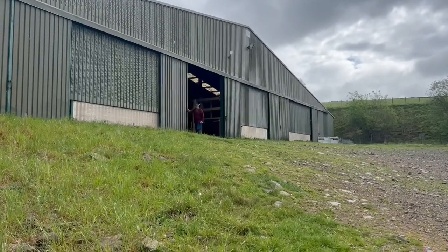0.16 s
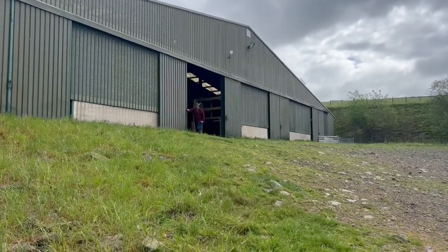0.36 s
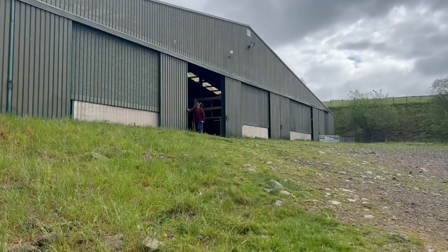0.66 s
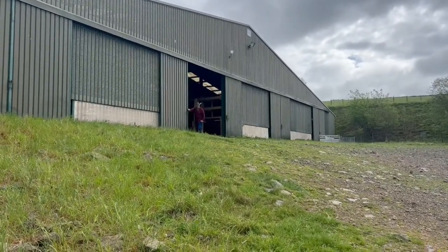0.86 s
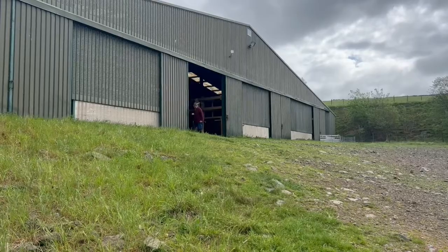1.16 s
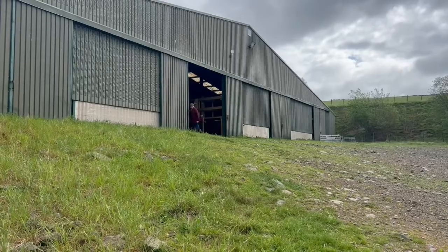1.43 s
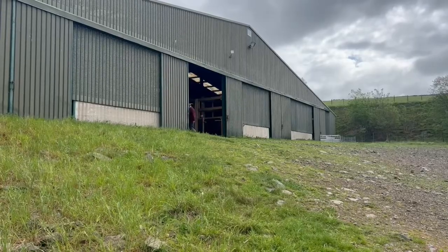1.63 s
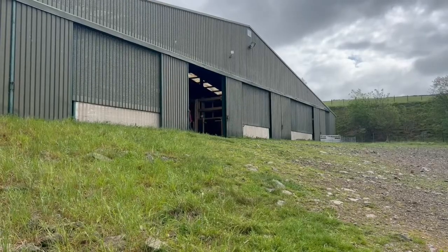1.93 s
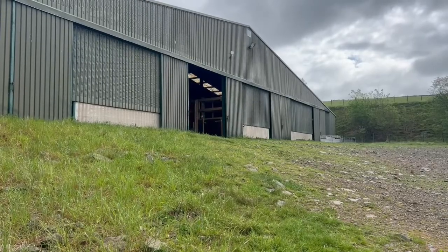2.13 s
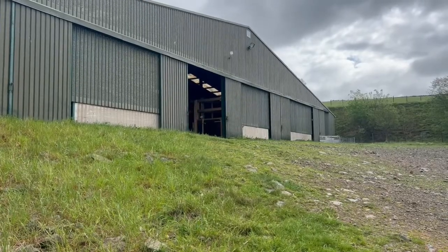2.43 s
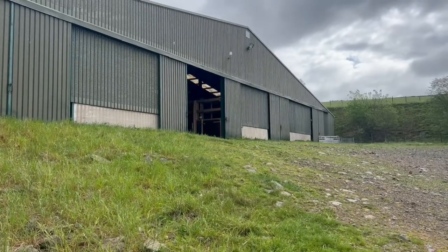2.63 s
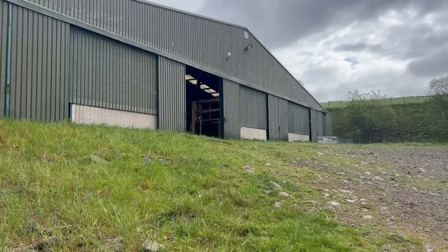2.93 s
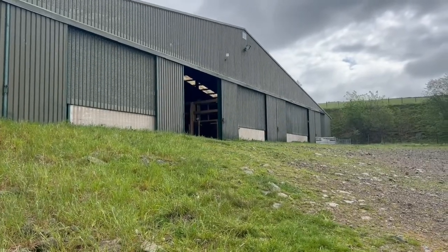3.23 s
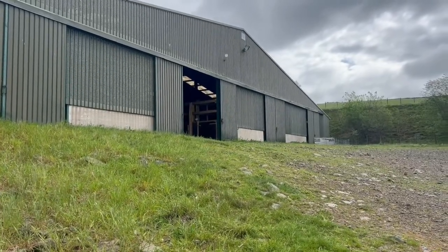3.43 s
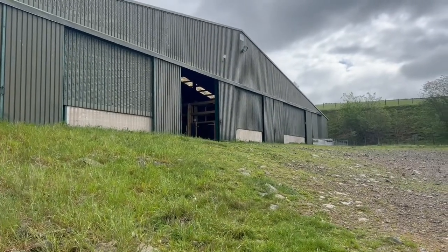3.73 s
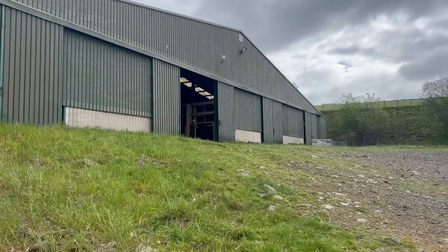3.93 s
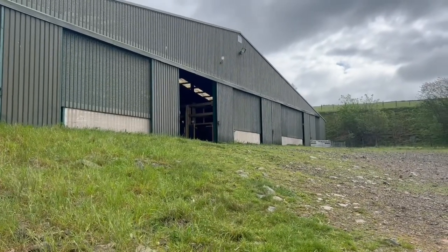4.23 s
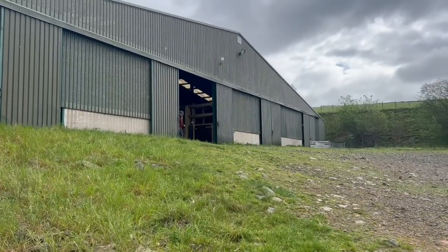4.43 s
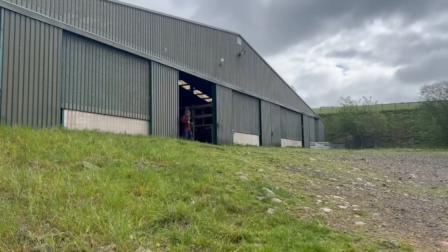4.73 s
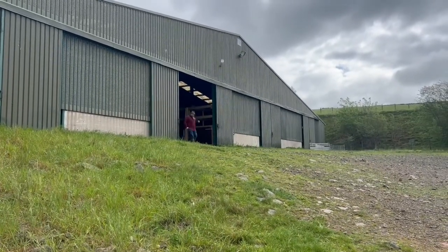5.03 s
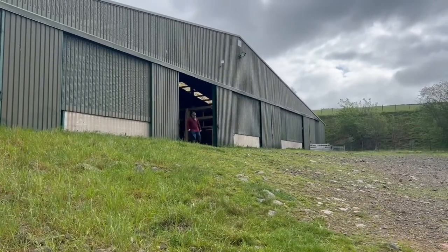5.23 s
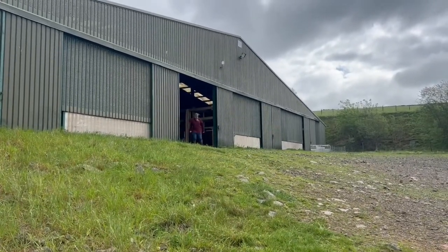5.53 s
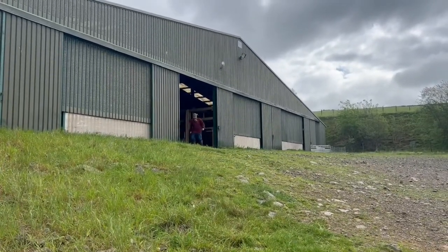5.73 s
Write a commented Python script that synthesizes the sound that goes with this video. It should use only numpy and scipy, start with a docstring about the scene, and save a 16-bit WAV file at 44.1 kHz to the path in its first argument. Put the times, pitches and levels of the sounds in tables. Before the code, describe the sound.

Gusty wind rumbles and thumps on a phone microphone while faint sweeping hisses and whistles, a distant sheep and small birds sound behind.

```python
"""A farmyard facing the open door of a big steel shed: gusts buffet a phone held low.
Wind is shaped noise that grows with each gust, plus single eddies that slap the microphone ports.
In the shed, blasts of air are noise with a ring that depends on pitch; something is swept in hissing,
whistling strokes of noise and moving resonances; a sheep bleats faintly as narrow bands over a rasp.
Small birds, as gliding tones with echoes, trill and chirp further off; dry ticks sound close by."""
import sys
import numpy as np
from scipy import signal
from scipy.fft import rfft, irfft, next_fast_len
from scipy.io import wavfile
from scipy.ndimage import uniform_filter1d

SR = 44100
rng = np.random.default_rng(int(sys.argv[2]) if len(sys.argv) > 2 else 0)


def pcm_store(signal):
    """Save signal as 16-bit PCM."""
    levels = np.round(np.clip(np.atleast_2d(signal), -1, 1) * 32767)
    wavfile.write(sys.argv[1], SR, levels.astype(np.int16).T)


N = 258867  # samples
TIME = np.arange(N) / SR  # s

# sweeping strokes: (start [s], length [s], relative hiss level [dB], treble relative to hiss [dB],
# relative whistle level [dB], whistle pitch at the start [Hz], whistle pitch halfway [Hz])
STROKES = [(0.24, 0.092, -65, -19, -72, 3200, 3300), (1.135, 0.12, -70.5, 1, -67, 2960, 3340),
           (1.298, .13, -69, -22, -66.5, 3140, 3150), (1.684, 0.1, -70.5, -7, -70.5, 3426, 3405),
           (1.845, 0.13, -76, -21, -68.5, 3190, 3135), (2.02, 0.11, -72.5, -19, -69.5, 3160, 3320),
           (2.339, 0.26, -73.5, -20.5, -72.5, 3150, 3310), (2.909, 0.24, -68.5, -5, -72.5, 3100, 3350),
           (3.158, 0.41, -62, -3, -64.5, 3230, 3556), (3.55, .21, -56.5, -14, -60, 2997, 3274),
           (4.019, 0.16, -65.5, -2, -64, 3330, 3440), (4.22, .13, -69, -16, -69.5, 3114, 3120),
           (4.515, 0.19, -66.5, -5.5, -67.5, 3070, 3240), (4.81, 0.15, -72, -9, -75, 3010, 3460),
           (5.22, 0.1, -70.5, -4, -66.5, 3030, 3490), (5.44, .14, -74, -10, -73, 3480, 3250),
           (5.735, 0.091, -79, -3, -73, 2860, 3150)]


def undb(db):
    """Decibel definition: 20 dB is a factor of ten in amplitude."""
    return 10 ** (np.asarray(db) / 20)


def unit(x):
    """Normalisation by effective value: scale to rms 1."""
    return x / np.sqrt(np.mean(x ** 2) + 1e-20)


def curve(rows, axis=1):
    """Linear interpolation in time of one column of a table."""
    rows = np.array(rows)
    return np.interp(TIME, rows[:, 0], rows[:, axis])


def at_pitch(points, hz):
    """Interpolation of (frequency, value) points on a logarithmic frequency axis."""
    f, value = np.transpose(points)
    return np.interp(np.log(np.maximum(hz, 1)), np.log(f), value)


def shape(x, gain):
    """Linear filtering: multiply the spectrum by a gain that is a function of frequency."""
    size = next_fast_len(N)
    hz = np.maximum(np.fft.rfftfreq(size, 1 / SR), 1)
    return irfft(rfft(x, size) * gain(hz), size)[..., :N]


def colour(x, points):
    """Spectral shaping to rms 1; the gain falls 12 dB per octave below the first point."""
    def gain(f):
        return undb(at_pitch(points, f)) * np.minimum(f / points[0][0], 1) ** 2
    return unit(shape(x, gain))


def butter(x, hz, kind, order=2):
    """Causal Butterworth filtering: low-, high- or band-pass with a maximally flat passband."""
    edges = np.clip(hz, 5, .45 * SR)
    return signal.sosfilt(signal.butter(order, edges, kind, fs=SR, output="sos"), x)


def octaves(x, first_hz, count):
    """Octave analysis: overlapping bands that add up to x again; yields (centre [Hz], band)."""
    for k in range(count):
        def gain(f):
            position = np.clip(np.log2(f / first_hz), 0, count - 1)
            return np.maximum(1 - abs(position - k), 0)
        yield first_hz * 2 ** k, shape(x, gain)


def walk(rate):
    """Slow random modulation: levels held for 1 / rate seconds, then smoothed; rms 1."""
    k = max(int(SR / rate), 2)
    steps = np.repeat(rng.standard_normal(N // k + 1), k)
    return unit(uniform_filter1d(uniform_filter1d(steps, k), k // 2)[:N])


def stereo(mid, side):
    """Sum-and-difference stereo: left and right from mid and side."""
    return np.array([mid + side, mid - side])


def wide_noise(side_db):
    """Partial coherence: white noise that is partly alike left and right."""
    return unit(stereo(rng.standard_normal(N), undb(side_db) * rng.standard_normal(N)))


def add(out, s, sound):
    """Superposition: mix a short sound into out at time s."""
    i = max(int(s * SR), 0)
    out[i:i + len(sound)] += sound[:N - i]


def hold_and_decay(start_s, length_s, rise_s, fall_s):
    """Exponential decay after a straight rise and a hold; fall_s is the amplitude time constant."""
    rise = np.clip((TIME - start_s) / rise_s, 0, 1)
    return rise * np.exp(-np.maximum(TIME - start_s - length_s, 0) / fall_s)


def trapezoid(start_s, length_s, edge_s):
    """Linear amplitude envelope: a straight rise, a hold and a straight fall after length_s."""
    rise = np.clip((TIME - start_s) / edge_s, 0, 1)
    return rise * np.clip(1 + (start_s + length_s - TIME) / edge_s, 0, 1)


def ring_noise(hz, width_hz):
    """Quadrature modulation: two slow noises on a carrier make one movable resonance."""
    phase = 2 * np.pi * np.cumsum(hz * np.ones(N)) / SR
    a, b = (unit(butter(rng.standard_normal(N), width_hz / 2, "lowpass")) for _ in range(2))
    return a * np.cos(phase) + b * np.sin(phase)


def echoes(x, t60_s):
    """Diffuse reverberation: convolution with decaying noise, partly alike left and right."""
    tail = wide_noise(-3)[:, :SR] * undb(-60 * TIME[:SR] / t60_s)
    tail = tail / np.linalg.norm(tail, axis=1, keepdims=True)
    return signal.fftconvolve(x[None], tail, axes=1)[:, :N]


def wind(side_db=-3.0):
    """Partial coherence of wind noise: the ports share gusts and eddies, with fine turbulence of their own."""
    # hardest eddies: (time [s], relative swing level [dB], relative snap level [dB], slap pitch [Hz])
    hard_eddies = [(0.052, -17.5, -46, 436), (0.254, -16, -35, 629), (0.579, -36, -35, 607),
                   (1.054, -33, -62, 299), (1.629, -24, -66, 372), (1.977, -24, -40.5, 442),
                   (2.172, -26, -31.5, 616), (2.537, -24.5, -53.5, 396.5), (2.640, -18.5, -28, 540),
                   (2.655, -9, -32, 364), (2.683, -15, -35, 348), (2.724, -12.5, -30.5, 413),
                   (2.737, -19.5, -30.5, 355), (2.773, -13.5, -48, 321), (2.934, -15.5, -21.5, 475),
                   (2.985, -20.5, -48.5, 474), (3.016, -16, -43, 397), (3.028, -17.5, -42.5, 336),
                   (3.095, -9, -23, 482), (3.126, -10.5, -26.5, 483), (3.155, -18, -31, 416.4),
                   (3.198, -14, -17.5, 483), (3.223, -15.5, -23.5, 577), (3.245, -15.5, -18, 473),
                   (3.294, -15, -18.5, 349), (3.307, -17.5, -21, 287.6), (3.346, -15.5, -30, 328),
                   (3.513, -17.5, -37, 477.6), (3.534, -19.5, -29.5, 439), (3.717, -23.5, -60, 479),
                   (3.981, -27.5, -51, 400.5), (4.160, -27.5, -52, 634), (4.171, -22.5, -41, 463),
                   (4.221, -25.5, -52.5, 386.5), (4.283, -15, -51, 381), (4.357, -25, -54, 362),
                   (4.375, -17, -40.5, 429), (4.398, -21.5, -65, 329), (4.457, -18.5, -33, 447),
                   (4.479, -28, -41, 557), (4.585, -22, -49, 358), (4.615, -18, -50.5, 619),
                   (4.627, -22.5, -62, 375.5), (4.689, -25.5, -61, 275.6), (4.969, -18, -58, 355),
                   (5.02, -23, -57, 380), (5.052, -13.5, -44.5, 637.7), (5.406, -29, -66, 382),
                   (5.649, -20, -55, 318), (5.711, -13.5, -55, 389.5), (5.743, -18, -42.5, 575),
                   (5.77, -14, -57, 328), (5.785, -17.5, -58, 482.7)]
    # lean of the wind to the left port: (frequency [Hz], share of mid [1])
    lean = [(400, 0), (650, .25), (1400, -.25)]
    gust_db, deep_db = wind_strength()
    eddies = hard_eddies + list(small_eddies(gust_db))
    mid, apart = (turbulence(gust_db, deep_db) + buffets(eddies) + tearing(gust_db) for _ in range(2))
    return stereo(mid, undb(side_db) * apart + shape(mid, lambda f: at_pitch(lean, f)))


def wind_strength(waver_db=5.0, waver_per_s=22, breeze_deep_db=2.0, rise_s=0.019, fall_s=0.039):
    """Addition of powers: gusts over a wavering breeze; gives stream and deep-rumble levels in dB."""
    # breeze between the gusts, before its waver: (time [s], level [dB])
    breeze = [(0, -37), (.35, -32.5), (.85, -35.5), (1.25, -37.5), (1.5, -44), (1.75, -31.5), (2.4, -38.5),
              (2.85, -34.5), (3.4, -32), (3.75, -34), (4.2, -32), (4.85, -32.5), (5.3, -33), (5.56, -37.5),
              (5.87, -25.5)]
    # gusts on top of the breeze: (start [s], length [s], level [dB], extra deep rumble [dB])
    gusts = [(0.0, 0.072, -22.5, -1.5), (0.215, 0.047, -28, -1), (0.54, 0.13, -34, 7),
             (1.319, 0.075, -34.5, 2), (1.565, 0.088, -29, 1.5), (1.808, 0.18, -24.5, -7),
             (2.088, 0.1, -25.5, 1.5), (2.536, 0.12, -20, 4.5), (2.625, 0.11, -18, 2), (2.998, 0.2, -17, 3),
             (3.187, 0.067, -14, -2), (3.237, 0.075, -12.5, 0.5), (3.494, 0.022, -17, -1),
             (3.744, 0.28, -34, 5), (4.243, 0.053, -27, 4.5), (4.336, 0.055, -22, 3),
             (4.444, 0.042, -24.5, 1.5), (4.579, 0.11, -24, 2.5), (4.76, 0.077, -36, 7),
             (4.939, 0.14, -24.5, 3), (5.114, 0.11, -28.5, -5.5), (5.693, 0.081, -23, 1.5)]
    power = undb(curve(breeze) + waver_db * walk(waver_per_s)) ** 2
    deep_power = power * undb(breeze_deep_db) ** 2
    for s, length_s, db, deep_db in gusts:
        gust = hold_and_decay(s, length_s, rise_s, fall_s)
        power = power + (undb(db) * gust) ** 2
        deep_power = deep_power + (undb(db + deep_db) * gust) ** 2
    return 10 * np.log10(power), 10 * np.log10(deep_power)


def turbulence(gust_db, deep_db, flutter_db=3.5, calm_db=-28, trim_db=-2, tilt_db=1.34, edge_hz=1400):
    """Turbulence scales: small eddies grow faster with the gust than large ones and come in bursts."""
    # rumble of the air stream: (frequency [Hz], relative spectral density [dB])
    rumble_spectrum = [(20, -10), (37, -7.5), (59, 6.5), (270, -7), (301, -7), (431, -15.5), (526, -17.5),
                       (653, -26), (857, -33.5), (1500, -54.5), (1950, -90.5), (3300, -120)]
    flutter, out = walk(70), 0
    steepen = .15  # extra dB per octave for each dB of gust above calm_db
    for hz, band in octaves(colour(rng.standard_normal(N), rumble_spectrum), 2 ** 5, count=7):
        fine = max(np.log2(hz / 100), 0)  # octaves above the big, slow eddies
        burst = unit(undb(flutter_db * min(0.048 + 0.58 * fine, 2) * flutter))
        stream_db = gust_db + (deep_db - gust_db) * max(1 - fine, 0)
        fine_db = fine * (steepen * (gust_db - calm_db) + tilt_db)
        out = out + band * burst * undb(stream_db + trim_db + fine_db)
    return butter(out, edge_hz, "lowpass", order=4)


def small_eddies(gust_db, swing_db=-11, scatter_db=6, snap_db=-35, calm_db=-28, hardening=0.41,
                 slap_hz=400, eddies_per_s=35):
    """Random arrivals: chance eddies grow with the wind and their snap faster; rows as in hard_eddies."""
    late, luck, speed = rng.random((400, 3)).T
    times = (np.arange(len(late)) + late) / eddies_per_s
    wind_db = np.interp(times, TIME, gust_db)
    size_db = wind_db + swing_db + scatter_db * (2 * luck - 1)
    sharp_db = size_db + snap_db + hardening * (wind_db - calm_db)
    pitch_hz = slap_hz * 2 ** (speed - .5)  # within half an octave either way
    return np.transpose([times, size_db, sharp_db, pitch_hz])[times < TIME[-1]]


def buffets(eddies, wake_hz=125, fall_s=0.00548, decay_s=0.011, rise_s=0.00053, snap_s=0.00068,
            shred_s=0.0033, shred_db=-13, swing_db=4.0, snap_db=1, crackle_db=-11, edge_hz=1700,
            softening=0.27):
    """Pressure transients: each eddy is a short snap, some shreds and a round swing of changing pitch.
    Eddies with little snap swell more gently."""
    out, t = np.zeros(N), np.arange(-SR // 40, SR // 14) / SR
    passing = np.exp(-abs(t) / shred_s)
    for (s, low_db, high_db, slap_hz), (turn, bulk) in zip(eddies, rng.random((len(eddies), 2))):
        onset_s = rise_s * undb(softening * (low_db - high_db))
        since = onset_s * np.logaddexp(0, t / onset_s)  # time since the slap, with a soft start
        swell = np.exp((t - since) / onset_s - since / decay_s)
        end_hz = wake_hz * 2 ** (.5 - bulk)
        pitch = end_hz + (slap_hz - end_hz) * np.exp(-since / fall_s)
        swing = swell * np.sin(2 * np.pi * (np.cumsum(pitch) / SR + turn))
        shreds = unit(butter(rng.standard_normal(len(t)), [450, 800], "bandpass", order=3)) * passing
        burst = rng.standard_normal(len(t)) * (np.exp(-(t / snap_s) ** 2) + undb(crackle_db) * passing)
        snap = butter(butter(burst, [700, 1350], "bandpass"), edge_hz, "lowpass", order=1)
        body = undb(low_db + swing_db) * (swing + undb(shred_db) * shreds)
        add(out, s + t[0], body + undb(high_db + snap_db) * 2 * snap / abs(snap).max())
    return butter(out, 1500, "lowpass", order=3)


def tearing(gust_db, level_db=-28, strong_db=-12, growth=3.72, ragged_db=5, build_s=0.013):
    """Nonlinear flow noise: a ragged crackle at the port grows much faster than the gust, up to strong_db."""
    # crackle of air tearing at the port: (frequency [Hz], relative spectral density [dB])
    crackle_spectrum = [(750, 5.5), (1600, -5), (2600, -15.5), (4300, -30.5), (5500, -41.5), (15000, -55.5)]
    crackle = colour(rng.standard_normal(N) * undb(ragged_db * walk(300)), crackle_spectrum)
    force = undb(growth * np.minimum(gust_db - strong_db, 0))
    keep = np.exp(-1 / (build_s * SR))
    lagging = signal.lfilter([1 - keep], [1, -keep], force)
    return undb(level_db) * crackle * np.minimum(force, lagging)  # builds slowly, falls at once


def air_blast(hold_s=0.031, rough_db=1.45, bounce_s=.003, bounce_db=-8):
    """Frequency-dependent reverberation: bursts of air ring in the shed, each octave with its own decay."""
    # colour of the blast: (frequency [Hz], relative level [dB])
    blast_spectrum = [(250, -34.5), (500, 2), (900, -3.5), (1350, -8), (1550, -15), (2100, -20.5),
                      (3400, -17), (5200, -28), (7000, -24.5), (9000, -28), (10300, -56), (11800, -29.5),
                      (13000, -33.5), (15500, -38)]
    # ring of the shed: (frequency [Hz], time to fall 60 dB [s])
    shed_t60 = [(300, 2.4), (1000, 1.89), (3300, 1.75), (7000, 1.16), (14000, 1.2)]
    # blasts; the first is already dying away at time 0: (time [s], relative level [dB])
    blast_times = [(-.5, -29.5), (0.348, -32)]
    air = wide_noise(-8)
    # a bounce off the floor makes it hollow
    air = air + undb(bounce_db) * np.roll(air, int(bounce_s * SR), axis=1)
    out = 0
    for hz, band in octaves(colour(air, blast_spectrum), 2 ** 8, count=7):
        fall_s = at_pitch(shed_t60, hz) / np.log(1000)
        out = out + band * sum(undb(db) * hold_and_decay(s, hold_s, 0.0031, fall_s) for s, db in blast_times)
    return out * undb(rough_db * walk(60))


def sweeping(body_db=-2, treble_db=-1, rise_s=0.02, t60_s=1.0, hard_db=-53):
    """Friction noise: hissing strokes hang in the shed; fixed resonances weaken when the push is soft."""
    # colour of the hiss: (frequency [Hz], relative level [dB])
    hiss_spectrum = [(1400, -34.5), (1800, 4.5), (2650, -0.5), (3100, 4.5), (3450, 7), (4100, -6.5),
                     (4500, -7), (5050, -11.5), (5600, -18.5), (6200, -18.5), (7500, -24.5), (8500, -20),
                     (9600, -37), (15000, -32)]
    # resonances rung by the push: (centre before its wander [Hz], width [Hz], relative level [dB])
    rings = [(1900, 100, -18), (2280, 180, -9.5), (3070, 110, -8), (4470, 82, -13)]
    power, treble_power = 1e-12, 1e-12
    for s, length_s, db, bright_db, *_ in STROKES:
        stroke = hold_and_decay(s, length_s, rise_s, t60_s / np.log(1000))
        power = power + (undb(db) * stroke) ** 2
        treble_power = treble_power + (undb(db + bright_db) * stroke) ** 2
    push = np.sqrt(power)
    scratch_db = 1.7
    hiss = colour(wide_noise(-4), hiss_spectrum) * undb(scratch_db * walk(42))
    body = shape(hiss, lambda f: 1 / (1 + (f / 4700) ** 8))
    treble = unit(hiss - body)
    hardness = np.sqrt(np.minimum(push / undb(hard_db), 1))
    wander = 1 + .008 * walk(9)
    mid, side = (hardness * sum(undb(db) * ring_noise(hz * wander, width) for hz, width, db in rings)
                 for _ in range(2))
    low_part = push * (undb(body_db) * unit(body) + stereo(mid, .5 * side))
    return low_part + undb(treble_db) * np.sqrt(treble_power) * treble


def squeal(echo_db=-2, t60_s=0.43, edge_s=0.03, droop=0.98):
    """Moving resonance: each stroke's breathy whistle bends in pitch, and the shed's echo holds on to it."""
    # resonances that bend together: (multiple of the whistle pitch [1], width [Hz], relative level [dB])
    bending = [(.91, 240, -7), (1, 150, -1), (1.385, 200, -17)]
    push, bend = 0, []
    for s, length_s, _, _, db, start_hz, middle_hz in STROKES:
        push = push + undb(db) * trapezoid(s, length_s, edge_s)
        bend += [(s, start_hz), (s + length_s / 2, middle_hz), (s + length_s, droop * middle_hz)]
    pitch = curve(sorted(bend))
    dry = push * sum(undb(db) * ring_noise(multiple * pitch, width) for multiple, width, db in bending)
    return dry + undb(echo_db) * echoes(dry, t60_s)


def overtones(width_hz=190, sag_per_s=0.057, edge_s=.06, level_db=-3, t60_s=0.76):
    """Extra resonances: some strokes ring their own, above or below the whistle; they sag and linger."""
    # resonances of single strokes: (start of the stroke [s], mid-stroke pitch [Hz], relative level [dB])
    extra_rings = [(1.135, 4450, -78.5), (3.158, 1840, -64.5), (3.158, 2110, -67.5), (3.158, 4450, -66.5),
                   (3.55, 5620, -67), (3.55, 6230, -75), (4.019, 5520, -72), (4.019, 8370, -80.5),
                   (4.515, 4500, -79), (4.515, 5550, -76), (5.22, 4770, -73.5)]
    dry = 0
    for s, hz, db in extra_rings:
        length_s = min(STROKES, key=lambda stroke: abs(stroke[0] - s))[1]
        push = trapezoid(s, length_s, edge_s)
        pitch = hz * (1 - sag_per_s * np.clip(TIME - s - length_s / 2, -length_s, length_s))
        dry = dry + undb(db + level_db) * push * ring_noise(pitch, width_hz)
    return dry + echoes(dry, t60_s)


def bleat(rasp_db=-68, smear_hz=32):
    """Partials in a reverberant space: the shed smears each into a wavering band over a breathy rasp."""
    # partials at full effort: (frequency [Hz], level [dB])
    partial_levels = [(635, -63.5), (942, -83), (1217, -85), (1394, -89), (1507, -72.5), (1717, -79),
                      (2148, -71), (2363, -70), (2470, -84.5), (2620, -81)]
    # course of the bleat: (time [s], effort [dB])
    effort = [(2.02, -34), (2.2, -3.5), (2.55, -2), (2.85, -5.5), (3.2, -14)]
    # breathy part: (frequency [Hz], relative level [dB])
    rasp_spectrum = [(900, -7), (1800, -4.5), (2300, 0.5), (2650, -1.5), (2900, -17.5), (6000, -49)]
    partials = sum(undb(db) * ring_noise(hz, smear_hz) for hz, db in partial_levels)
    rasp = undb(rasp_db) * colour(wide_noise(-0.5), rasp_spectrum)
    sounding = (TIME > effort[0][0]) & (TIME < effort[-1][0])
    return (partials + rasp) * sounding * undb(curve(effort))


def ticks(decay_s=0.00095):
    """Impulsive excitation: tiny dry clicks of grit and grass close by, as decaying band-passed noise."""
    # ticks: (time [s], peak level [dB], lowest frequency [Hz], highest frequency [Hz])
    tick_rows = [(.29, -57, 5700, 8600), (3.4, -50, 8000, 9800), (3.532, -47.5, 5800, 9530),
                 (3.816, -51, 8030, 9640), (4.75, -47.5, 1400, 3110), (4.984, -49, 1600, 3630)]
    out, t = np.zeros(N), TIME[:SR // 20]
    for s, db, low_hz, high_hz in tick_rows:
        burst = rng.standard_normal(len(t)) * np.exp(-t / decay_s)
        grit = butter(burst, [low_hz, high_hz], "bandpass", order=3)
        add(out, s, undb(db) * grit / abs(grit).max())
    return out


def chirp(length_s, from_hz, to_hz, fuzz_hz=0):
    """Frequency modulation: one gliding note, slightly off pitch by chance, with a fast random tremble."""
    size = int(length_s * SR)
    tremble = unit(uniform_filter1d(rng.standard_normal(size), size=90))
    glide = np.linspace(from_hz, to_hz, size) * (1 + 0.0068 * rng.standard_normal())
    pitch = glide + fuzz_hz * tremble
    return np.hanning(size) * np.sin(2 * np.pi * np.cumsum(pitch) / SR)


def birds(trill_s=0.57, step_s=0.081, trill_db=-75, chirp_db=-3, echo_db=-1, t60_s=0.49):
    """Direct and scattered sound: a quick trill and a few lone, husky chirps with echoes of the yard."""
    # lone chirps: (time [s], length [s], nominal start pitch [Hz], nominal end pitch [Hz],
    # relative level [dB])
    lone_chirps = [(2.088, 0.088, 3227, 3400, -58), (4.972, .06, 4460, 4150, -65.5),
                   (5.093, 0.058, 3730, 4000, -66), (5.68, 0.058, 4070, 3810, -68)]
    out = np.zeros(N)
    uneven_db, fuzz_hz = 2.5, 150
    for k, (loud, late) in enumerate(rng.standard_normal((18, 2))):
        note = chirp(0.035, 4480, 4170, fuzz_hz)
        add(out, trill_s + k * step_s + 0.0028 * late, undb(trill_db + uneven_db * loud) * note)
    for s, length_s, from_hz, to_hz, db in lone_chirps:
        add(out, s, undb(db + chirp_db) * chirp(length_s, from_hz, to_hz, fuzz_hz))
    return out + undb(echo_db) * echoes(out, t60_s)


def yard_air(level_db=-56, sway_db=1):
    """Diffuse background noise: the soft hush of the open country, swaying in level."""
    # colour of the hush: (frequency [Hz], relative level [dB])
    hush_spectrum = [(250, -22.5), (390, 4), (1340, -16.5), (1700, -24), (3200, -20), (3900, -27.5),
                     (8600, -42), (15000, -43)]
    return colour(wide_noise(-5), hush_spectrum) * undb(level_db + sway_db * walk(6.9))


def pan(x, left_db):
    """Level difference between channels: make the left louder than the right."""
    return x * undb(stereo(0, left_db / 2))[:, None]


def phone_stereo(x):
    """Interchannel phase: the phone's stereo sets far sound out of step between left and right, by pitch."""
    # lead of the left channel: (frequency [Hz], phase [rad])
    lead = [(550, 1.23), (1050, 1.4), (2200, 0.92), (4300, 0.95), (7200, -0.016), (9000, -2), (12500, 0)]
    return shape(x, lambda f: np.exp(.5j * stereo(0, at_pitch(lead, f))))


def centre_bass(x):
    """Frequency-dependent stereo width: the lows are alike in both channels, up to a drifting edge."""
    # edge between centred lows and wide highs: (time [s], frequency [Hz])
    centred_below = [(.3, 760), (.42, 650), (1.7, 344), (3.3, 341), (3.53, 549), (3.7, 1080), (4.0, 1250),
                     (4.4, 1020), (4.85, 1211), (5.87, 930)]
    f, t, side = signal.stft((x[0] - x[1]) / 2, SR, nperseg=2 ** 10)
    edge = np.interp(t, *np.transpose(centred_below))
    width = np.exp(-(edge / np.maximum(f, 1)[:, None]) ** 3)
    return stereo(x.mean(axis=0), signal.istft(side * width, SR)[1][:N])


def scene():
    """Superposition of sources: wind and ticks in front; shed, birds and hush behind."""
    strokes = sweeping() + squeal() + overtones()
    shed = pan(air_blast(), left_db=1.0) + pan(strokes, left_db=-1.0) + bleat()
    return wind() + pan(ticks(), left_db=-9.0) + phone_stereo(shed + birds() + yard_air())


def record(dry, top_hz=15650):
    """Band limits and saturation: the phone thins deep rumble, rounds peaks, centres bass, cuts the top."""
    thinned = butter(dry, 24, "highpass")
    rounded = np.tanh(0.8 * thinned) / 0.66
    top_cut = signal.ellip(8, .2, 70, top_hz, fs=SR, output="sos")
    return signal.sosfilt(top_cut, centre_bass(rounded))


dry = scene()
out = record(dry)
pcm_store(out)
```